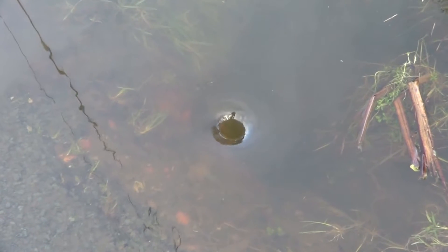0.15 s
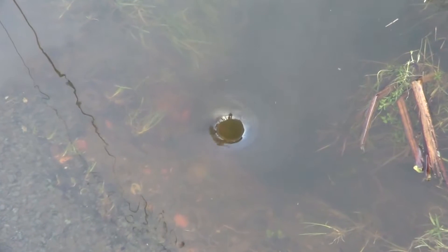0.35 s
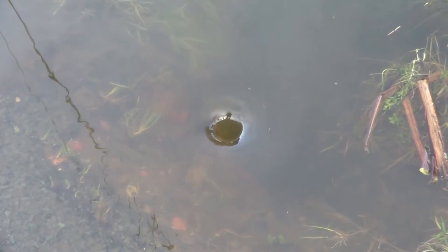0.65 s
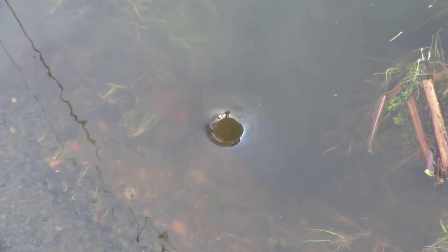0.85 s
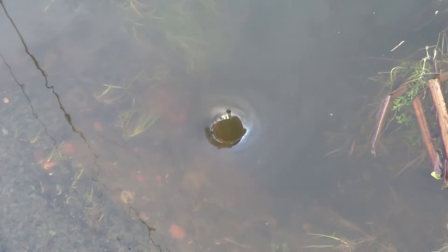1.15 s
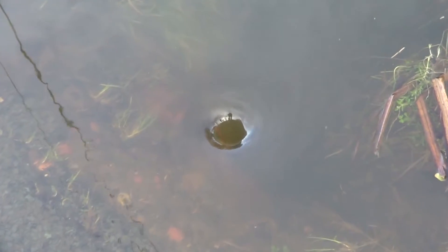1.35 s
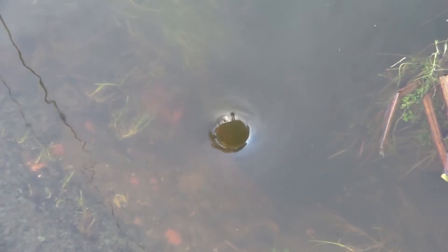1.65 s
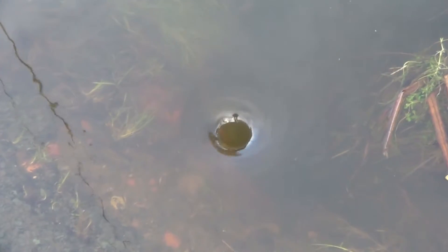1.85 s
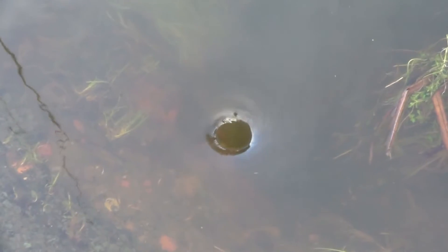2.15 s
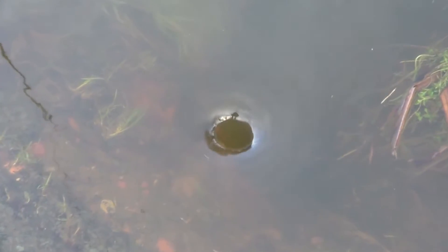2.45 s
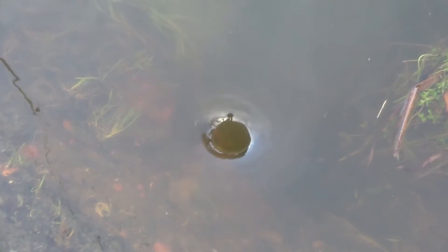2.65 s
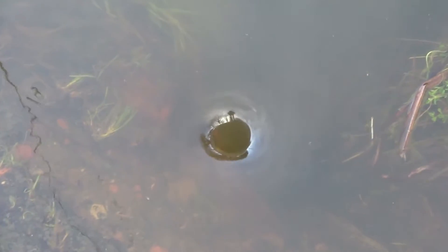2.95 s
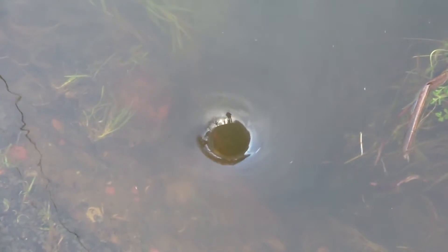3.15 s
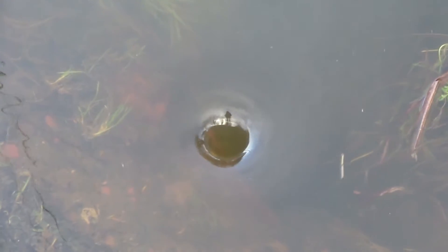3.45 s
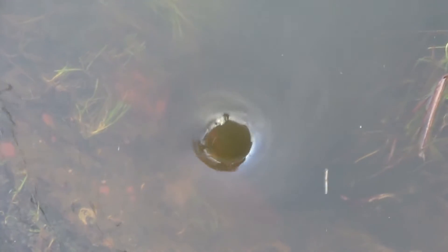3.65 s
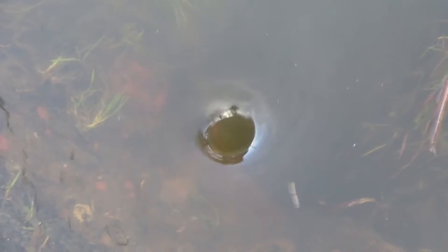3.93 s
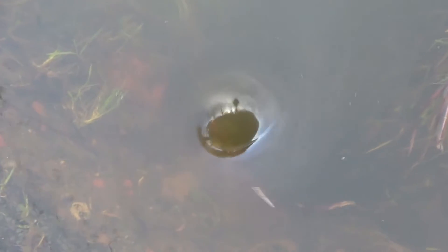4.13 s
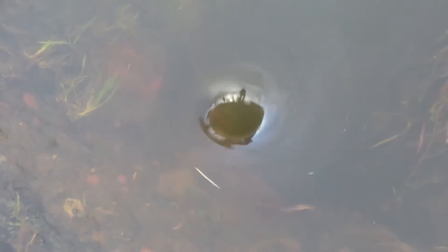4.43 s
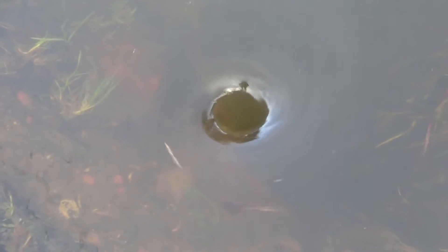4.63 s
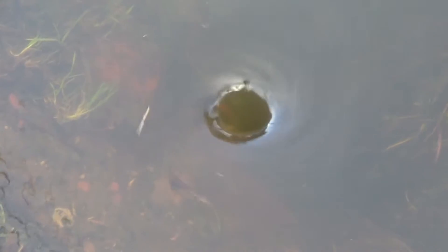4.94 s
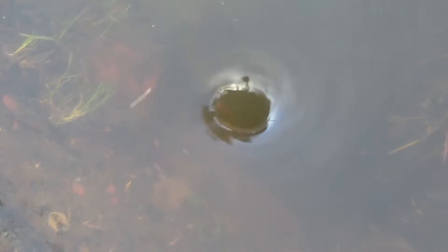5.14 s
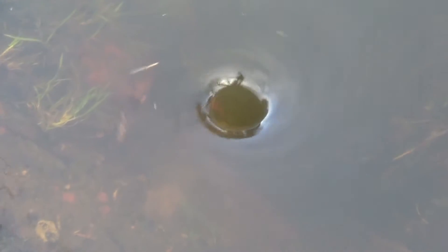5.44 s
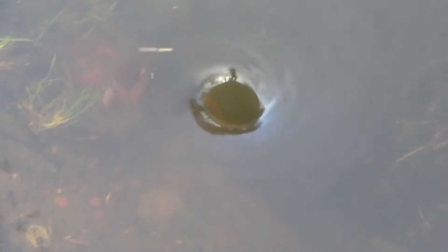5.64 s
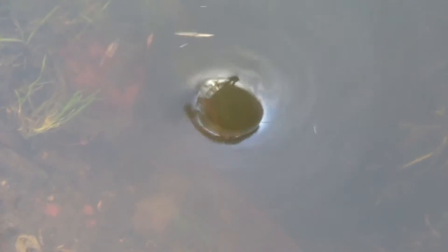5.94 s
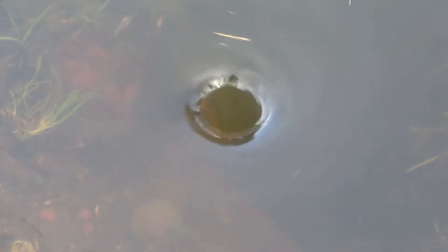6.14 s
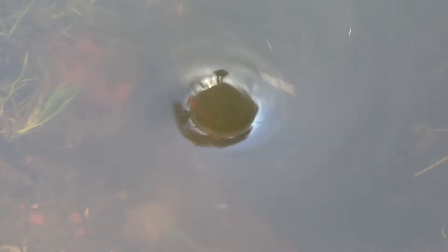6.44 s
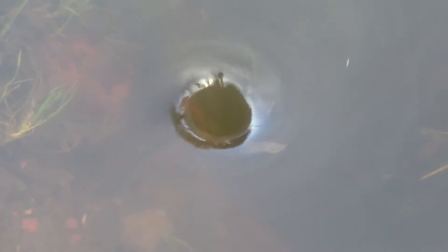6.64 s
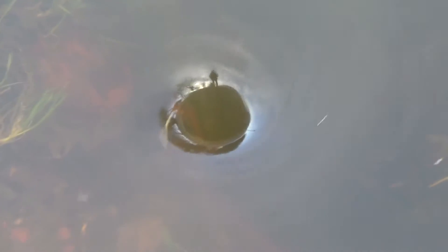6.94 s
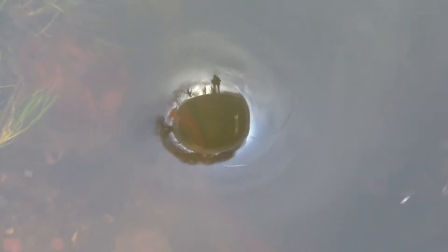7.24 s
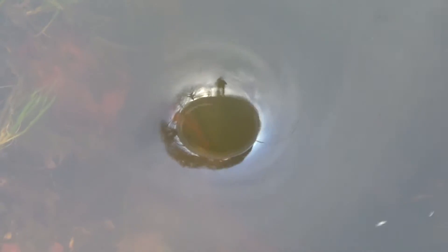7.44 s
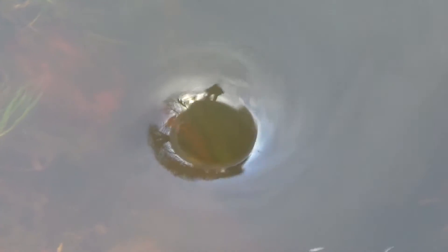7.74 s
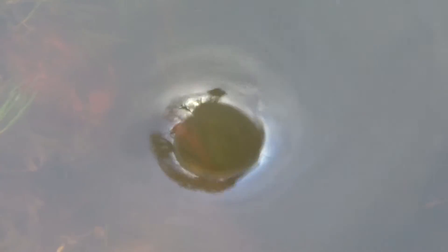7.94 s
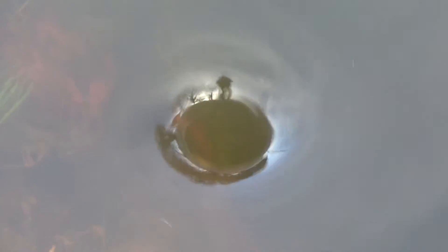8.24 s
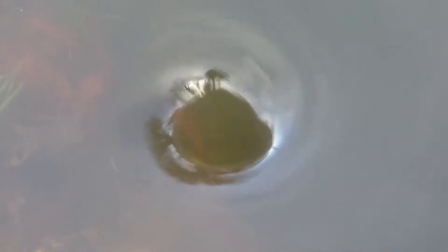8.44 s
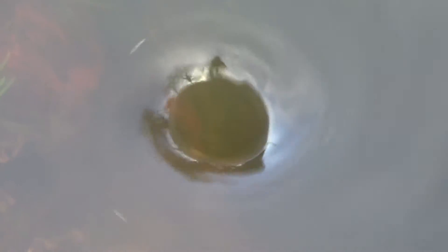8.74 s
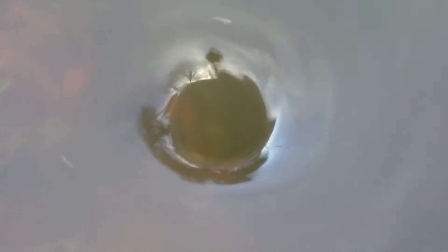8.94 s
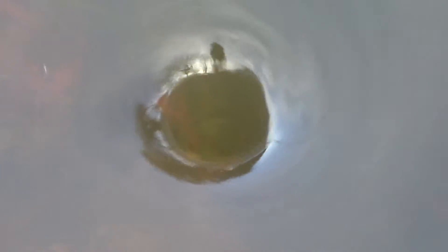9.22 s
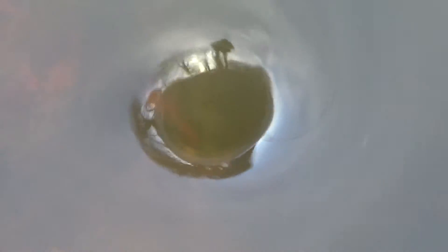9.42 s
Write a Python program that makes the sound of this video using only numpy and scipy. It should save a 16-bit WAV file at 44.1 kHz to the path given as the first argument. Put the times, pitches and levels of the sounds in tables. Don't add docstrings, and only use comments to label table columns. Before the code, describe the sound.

Water swirls and gulps noisily into a little road hole, stops to ticking drips while far birds whistle, then gurgles again and sputters out.

```python
import sys
import numpy as np
from scipy import signal
from scipy.io import wavfile
from scipy.ndimage import uniform_filter1d

SR = 44100
rng = np.random.default_rng(int(sys.argv[2]) if len(sys.argv) > 2 else 0)


def field_ratio(decibels):
    return 10 ** (np.asarray(decibels, dtype=float) / 20)


def digitize_waveform(pressure):
    field = np.atleast_2d(pressure).T
    bounded = np.clip(field, -1, 1)
    quanta = np.round(bounded * 32767).astype(np.int16)
    wavfile.write(sys.argv[1], SR, quanta)


N = 422478
FILTER_HZ = np.fft.rfftfreq(4096, 1 / SR)


def evened(x):
    return x / np.sqrt(np.mean(x ** 2) + 1e-20)


def read(points, hz):
    f, value = np.transpose(points)
    return np.interp(np.log(hz + 1), np.log(f + 1), value)


def add(mix, s, sound):
    part = mix[round(s * SR):][:len(sound)]
    part += sound[:len(part)]


def chance(width):
    size = max(int(width * SR), 2)
    return evened(uniform_filter1d(uniform_filter1d(rng.standard_normal(N), size), size))


def coloured(x, gain):
    log_gain = np.log(np.maximum(np.r_[gain, gain[-2:0:-1]], 1e-5))
    taps = np.fft.ifft(np.exp(np.conj(signal.hilbert(log_gain)))).real[:2048]
    return signal.oaconvolve(x, taps)[:N]


def highpass(x, hz):
    return signal.sosfilt(signal.butter(2, hz, "high", fs=SR, output="sos"), x)


def resonate(x, hz, width):
    turn = np.exp(2j * np.pi * np.cumsum(hz * np.ones(len(x))) / SR)
    r = np.exp(-np.pi * width / SR)
    return 2 * (turn * signal.lfilter([1 - r], [1, -r], x / turn)).real


# time in seconds, level in dB.
SUCTION = [
    [(0.0, -20.5), (0.92, -18), (1.15, -25.5), (1.9, -18.5), (2.44, -23.5), (2.52, -14.5), (2.85, -41.5),
     (3.42, -40.5), (3.8, -52)],
    [(5.35, -50), (5.41, -29.5), (5.62, -26), (5.82, -21), (7.6, -19), (8.25, -16.5), (8.3, -22),
     (8.56, -25), (9.1, -48.5)],
]
# opening in seconds, length in seconds,
# loss of large bubbles in dB, loss of small bubbles in dB.
CHOKES = [(0.372, 0.064, 11, 7.5), (0.438, 0.035, 18, 7), (0.999, 0.052, 15, 17), (1.132, 0.1, -3, 8.5),
          (1.246, 0.024, 4, 29), (1.449, .03, 12, 18), (1.678, 0.02, 7, 16), (2.28, .03, 32.5, 12),
          (2.478, 0.016, 7.5, 29), (3.337, 0.25, 7, 13), (5.475, 0.063, 19, 21), (5.587, 0.13, 39, 4.5),
          (5.749, 0.11, -1, 24), (0.621, 0.041, 6, 7), (6.166, 0.089, 0.5, 9.5), (6.27, 0.031, 2, 10),
          (6.518, 0.008, 16, -4), (6.867, 0.024, 24, -8), (7.25, 0.052, 3.5, 3.5), (7.827, 0.19, 15.5, 6.5),
          (8.277, 0.35, 19, 9.5), (8.286, 0.024, 10, 18), (8.409, 0.031, 30.5, 14), (8.694, 0.13, 13, 8.5),
          (8.963, 0.19, 0, 11), (9.094, .54, 25.5, -5), (5.746, 0.22, 0.5, 7), (8.625, .7, 1, 4.5)]


def suction(column):
    close_share, open_s = 0.5, 0.0013
    t = np.arange(N) / SR
    loss_db = np.zeros(N)
    for row in CHOKES:
        s, length = row[:2]
        span = slice(round((s - length) * SR), round(s * SR))
        left = s - t[span]
        closed = np.minimum((length - left) / (close_share * length), left / open_s)
        loss_db[span] += row[column] * np.clip(closed, 0, 1)
    return sum(field_ratio(np.interp(t, s, db, -99, -99) - loss_db) for s, db in map(np.transpose, SUCTION))


def bubble(hz, cycles, glide, tick, soft=0.3, size=900):
    turns = np.arange(size) * hz / SR
    fade = 0.6 * np.exp(-turns / 1.5) + 0.4 * np.exp(-turns / cycles)
    ring = np.sin(2 * np.pi * turns * (1 + glide * np.minimum(turns / cycles, 2))) * fade
    u = np.arange(size) / 1.3
    return ring * (1 - np.exp(-turns / soft)) + tick * (1 - u) * np.exp(-u)


def swarm(level, gulping, lo_hz, hi_hz, per_s, cycles, spread_db, clump_db, tick, count, size):
    clumps = field_ratio(clump_db * (gulping + 0.5 * chance(0.012)))
    busy = np.minimum(evened(level), 1) ** 1.1
    born = rng.random(N) < per_s / SR * busy * clumps / clumps.mean()
    strength = field_ratio(spread_db * np.minimum(rng.exponential(1, N), 4)) * rng.choice([-1., 1.], N)
    train = born * level / np.sqrt(busy + 1e-9) * strength
    kind, draws, out = rng.integers(0, count, N), rng.random((count, 2)), np.zeros(N)
    for k, hz in enumerate(np.geomspace(lo_hz, hi_hz, count)):
        ringing = cycles * (0.2 + 1.54 * draws[k, 0]) * (hz / lo_hz) ** 0.48
        grain = bubble(hz, ringing, 0.024 * draws[k, 1], tick, size=size)
        out += signal.oaconvolve(train * (kind == k), evened(grain) * np.sqrt(hz / lo_hz))[:N]
    return out


def wake(rows, t60):
    s, db = np.transpose(rows)[:2]
    kicks = np.zeros(N)
    kicks[np.round(s * SR).astype(int)] = field_ratio(db)
    flurry = np.sqrt(abs(signal.lfilter([1], [1, -field_ratio(-60 / (t60 * SR))], kicks)))
    return evened(flurry - flurry.mean())


# frequency in Hz, level in dB per Hz.
HOLE = [(150, -32), (250, -8), (308, -20), (415, -16), (834, -3.5), (1410, 1.5), (1770, -2), (1960, -6),
        (2500, -5), (3370, -3.5), (5250, -11.5), (6770, -8), (8350, -8.5), (11000, -11), (16200, -24.5)]


def gurgle():
    split_hz = 1790
    colour = field_ratio(read(HOLE, FILTER_HZ))
    high_share = 1 - 1 / (1 + (FILTER_HZ / split_hz) ** 12)
    big, fine = field_ratio(-3) * suction(column=2), suction(column=3)
    gulping = chance(0.014) + 0.38 * chance(0.029)
    big_wake = wake(GULPS + LATE_GULPS + LAST_GULPS + PLOPS + LATE_PLOPS, 0.12)
    large = swarm(big, 0.6 * gulping + 0.9 * big_wake, 454.4, 1923, per_s=420, cycles=8.6,
                  spread_db=3.5, clump_db=2.5, tick=9.2, count=24, size=3000)
    fine_wake = wake(SNAPS + LATE_SNAPS + SPITS + LATE_SPITS + FIRST_CRACKS + LAST_CRACKS, 0.046)
    small = swarm(fine, 0.6 * gulping + 0.78 * fine_wake, 2202, 15260, per_s=1000, cycles=6.4,
                  spread_db=4.0, clump_db=3.5, tick=0.66, count=22, size=600)
    large = evened(coloured(large, colour)) * np.sqrt(np.mean(big ** 2))
    small = evened(coloured(small, colour * np.sqrt(high_share))) * np.sqrt(np.mean(fine ** 2))
    return field_ratio(-0.5) * large + field_ratio(-1.0) * small


GULPS = [(0.049, -19, 1066), (0.106, -16, 1050), (0.204, -13, 960), (0.31, -12.5, 904), (0.637, -29, 1010),
         (0.76, -22, 1060), (0.794, -22, 1070), (0.841, -14, 1030), (0.923, -18, 1070), (1.116, -17, 900),
         (1.198, -13.5, 874), (1.279, -15, 846), (1.311, -18.5, 765), (1.477, -20, 829), (1.656, -16, 833),
         (1.699, -19, 1010), (1.764, -14, 885), (1.812, -17, 960), (1.885, -13, 1010), (1.927, -12, 970),
         (2.025, -24, 880), (2.083, -14, 873), (2.129, -15.5, 990), (2.276, -21, 875), (2.368, -10.5, 884),
         (2.448, -15.5, 854), (2.489, -12.5, 797), (2.519, -13, 1060)]
LATE_GULPS = [(5.597, -13.5, 880), (5.629, -15, 906), (5.679, -12.5, 920), (5.786, -18.5, 1050),
              (6.003, -16, 730), (6.09, -10, 1060), (6.263, -12, 960), (6.397, -20, 1040),
              (6.451, -14, 820), (6.539, -9.5, 823), (6.572, -11, 910), (6.731, -18, 872),
              (6.87, -12, 1035), (6.966, -16, 894), (7.032, -11, 760), (7.087, -14.5, 910),
              (7.159, -17, 1020), (7.248, -14, 1004), (7.344, -12, 748), (7.432, -14.5, 1023),
              (7.564, -10.5, 1004), (7.666, -18, 820), (7.841, -23.5, 795), (7.911, -27, 1040),
              (7.956, -16.5, 865)]
LAST_GULPS = [(8.086, -21.5, 1220), (8.107, -15, 1560), (8.297, -8, 1340), (8.301, -7.5, 770),
              (8.332, -20, 853), (8.355, -8, 1260), (8.404, -16, 1660), (8.434, -11, 1450),
              (8.434, -9.5, 837), (8.446, -12, 744), (8.467, -9, 860), (8.491, -15.5, 1016),
              (8.525, -14.5, 1150), (8.553, -20, 884)]
PLOPS = [(0.049, -15, 1100), (0.107, -10, 1380), (0.2045, -10, 1410), (0.2773, -9.5, 1430),
         (0.3506, -13, 1256), (0.3691, -14.5, 1310), (0.4135, -15.5, 1264), (0.641, -10, 1280),
         (0.7607, -12, 1090), (0.7965, -10, 1090), (0.9262, -3, 1530), (0.9956, -19, 1600),
         (1.0736, -15, 1180), (1.1475, -6.5, 1220), (1.255, -15, 1210), (1.7853, -18, 1320),
         (1.8108, -24, 1360), (1.837, -11.5, 1410), (1.8726, -5, 1420), (2.159, -12, 1260),
         (2.2767, -13, 1600), (2.3984, -13, 1240), (2.43, -12, 1200), (2.4735, -16, 1490)]
LATE_PLOPS = [(5.3996, -22, 1430), (5.4761, -12, 1360), (5.5926, -8.5, 1430), (5.6277, -16, 1280),
              (5.6822, -8, 1180), (5.753, -13, 1710), (5.8268, -4.5, 1370), (5.957, -11, 1410),
              (6.002, -3, 1470), (6.0896, -13, 1130), (6.2596, -18, 1250), (6.364, -13.5, 1680),
              (6.4168, -12.5, 1300), (6.5292, -4, 1220), (6.5975, -20.5, 1220), (6.8196, -16.5, 1790),
              (6.8717, 1, 1320), (7.0224, -9, 1140), (7.088, -12, 1350), (7.1516, -12, 1390),
              (7.345, -8, 1400), (7.488, -9, 1380), (7.803, -20, 1600), (7.9121, -6, 1190)]
SNAPS = [(0.2344, -7.5, 3620), (0.4459, -9, 2500), (0.5127, 1, 3800), (0.6045, -8, 3160),
         (0.6569, -3, 2330), (0.7422, -2, 3570), (0.7946, -3.5, 2980), (0.8355, -7, 3330),
         (1.0326, -4, 2450), (1.1623, -9, 2590), (1.2695, 5, 3770), (1.3339, -2, 3350), (1.4486, -17, 2480),
         (1.4666, -0.5, 2400), (1.5524, -13, 2100), (1.5524, -3, 2860), (1.5768, 3, 3500),
         (1.6821, -13, 3730), (1.7474, -5.5, 3880), (1.9031, -8, 3240), (2.159, -10, 2410),
         (2.2313, -9, 4040), (2.2493, -5.5, 3760), (2.2757, -11, 2420), (2.2937, -10.5, 2500),
         (2.4234, -9, 3020), (2.4857, 0.5, 2330), (2.5456, 4.5, 3500), (2.7003, -13, 3480)]
LATE_SNAPS = [(5.7937, 1, 3100), (6.0861, -3, 2730), (6.0991, 2.5, 2350), (6.1747, -4, 3810),
              (6.2594, -4, 3250), (6.368, -8, 2610), (6.3805, -9, 3740), (6.4166, -5, 3400),
              (6.4705, -5, 2750), (6.551, -0.5, 2480), (6.6898, -14, 2290), (6.7145, -4.5, 2120),
              (6.7335, -4, 2200), (7.068, -3, 2380), (7.139, -2.5, 3400), (7.3221, -3.5, 2500),
              (7.345, -7, 3700), (7.3676, 2.5, 3360), (7.3987, -6, 3100), (7.449, -9, 3540),
              (7.5219, -2.5, 3500), (7.697, -4.5, 3200)]
SPITS = [(0.1999, -3, 6700), (0.4534, -8, 8400), (0.617, -17, 8480), (0.7003, -4, 7410),
         (1.0794, -8.5, 10800), (1.1967, -7.5, 6440), (1.2226, -6.5, 8150), (1.269, -9, 6770),
         (1.3054, -9.5, 6800), (1.3578, -7.5, 8300), (1.4486, -9, 9100), (1.4666, -9.5, 7010),
         (1.5524, -7.5, 7000), (1.6811, -8, 6700), (1.7594, -3.5, 7740), (1.8223, -7, 8960),
         (1.9031, -2, 6900), (2.1321, -3, 6720), (2.1919, -4.5, 7800), (2.4843, -4, 8200),
         (2.5042, -5, 6700), (2.6828, -12, 8380)]
LATE_SPITS = [(5.7853, -8, 7000), (5.806, -2, 10300), (5.8656, -8, 7980), (5.903, -7, 6800),
              (5.9564, -5, 11400), (5.9934, -5, 7400), (6.3315, -20, 6360), (6.472, -9, 8500),
              (6.689, -5.5, 6950), (6.9148, -1, 6650), (7.3254, -12.5, 6600), (7.4246, -9, 9000),
              (7.4373, 2.5, 8400), (7.4807, -7, 6400), (7.5, 4, 7150), (7.6254, -4.5, 8900),
              (7.713, -9, 6690), (7.8024, 3.5, 9700), (7.832, -10, 6950), (7.9113, -3.5, 8550)]
TICKS = [(2.7682, -11, 9100), (2.8996, -15, 8100), (2.9987, -12.5, 5300), (3.038, -16, 11300),
         (3.0495, -13, 5730), (3.077, -18, 8350), (3.3984, -13, 8400), (3.5477, -20, 8350),
         (3.9973, -11, 6340), (4.0054, -25, 5790), (5.133, -23, 10800), (9.2744, -22, 8400),
         (9.2834, -25, 8480)]
FIRST_CRACKS = [(5.363, -17, 4610), (5.3932, -23, 3200), (5.3935, -11, 3350), (5.428, -9.5, 3380),
                (5.4745, -22, 11000), (5.4747, -2, 2600), (5.493, -3, 2150), (5.517, -3.5, 7400),
                (5.5404, -20, 6930), (5.5464, -19, 4330), (5.5723, -8, 3990), (5.5901, -1, 2650),
                (5.597, 2, 3500), (5.6287, -7, 2490), (5.6412, -5, 2900), (5.6585, -3, 2610),
                (5.676, -6, 3370), (5.71, -17, 2730), (5.7519, -22, 2980), (5.7525, -5, 3000),
                (5.786, -9, 6950), (5.7936, -7, 3120)]
LAST_CRACKS = [(7.9917, -4, 4540), (8.0118, -21, 8230), (8.013, -0.5, 6800), (8.0302, -10, 3960),
               (8.0406, -18, 6230), (8.0472, -18, 3200), (8.073, -7, 10600), (8.1165, -20, 2650),
               (8.1167, 0, 9200), (8.1285, -4.5, 6900), (8.1365, -5, 8500), (8.2158, -24, 4580),
               (8.2167, -10.5, 8670), (8.2263, -11, 9120), (8.2323, -10.5, 2500), (8.2492, -10, 2640),
               (8.2922, -2.5, 2530), (8.2966, -18, 2100), (8.297, 5.5, 3220), (8.3315, -8, 8040),
               (8.337, -5, 6900), (8.3537, 2, 10800), (8.3745, -8.5, 2910), (8.4042, -2.5, 3000),
               (8.4333, 3.5, 3370), (8.468, -9, 2890), (8.4956, -6, 2350), (8.503, -7, 2830),
               (8.5276, -13, 9140), (8.549, -4, 3300), (8.561, -2.5, 8300), (8.5606, 1, 6630)]
# start in seconds, peak in dB, pitch in Hz.
DRIPS = [(2.738, -32, 1390), (2.7703, -27, 2800), (2.7703, -15, 4000), (2.898, -19.5, 2480),
         (2.9858, -24, 3530), (2.9974, -24.5, 1450), (3.0256, -26, 1400), (3.0875, -30, 3100),
         (3.0906, -19.5, 2910), (3.1406, -27, 2250), (3.1487, -25, 1480), (3.35, -32, 1350),
         (3.3893, -28.5, 1680), (3.3979, -23.5, 3760), (3.4393, -28, 2840), (3.4956, -27, 3200),
         (3.538, -32, 2190), (3.558, -26, 3420), (3.6007, -25.5, 3860), (3.7803, -26.5, 3730),
         (3.9976, -32, 2330), (4.0292, -29.5, 3620), (5.1324, -27, 4320), (5.1412, -24.5, 3320),
         (8.6185, -24, 3260), (8.6811, -24, 7150), (8.6828, -17, 8900), (8.704, -22, 3360),
              (8.739, -47, 2660), (8.758, -18, 7900), (8.7805, -17, 6750), (8.8024, -21, 8850),
              (8.822, -29, 6700), (8.963, -20.5, 6360), (8.982, -24.5, 6820), (9.003, -28, 3720),
              (9.0755, -29.5, 7160), (9.088, -30, 8000)]
# frequency in Hz, gain in dB.
RIM = [(3800, 0), (5200, -4.5), (6800, 1), (11000, -1.5), (16000, -9)]


def single_bubbles():
    ring_s, ring_s_per_db = 0.036, 0.003
    plops = np.zeros(N)
    for rows, trim_db in [(GULPS + LATE_GULPS + LAST_GULPS, 4.0), (PLOPS + LATE_PLOPS, 3.0)]:
        for (s, db, hz), draw in zip(rows, rng.random((len(rows), 2))):
            t60 = abs(ring_s - ring_s_per_db * (db + 10.5)) * 900 / hz * (0.6 + 1.7 * draw[0])
            sound = bubble(hz, t60 * hz / np.log(1000), 0.0024 * draw[1], 0.82, size=3000)
            add(plops, s, field_ratio(db + trim_db) * sound)

    snaps = np.zeros(N)
    for rows, cycles, tick, trim_db in [(SNAPS + LATE_SNAPS, 3.0, 0.6, 3.5),
                                        (SPITS + LATE_SPITS, 2.5, 0.5, 4.0),
                                        (TICKS, 1.5, 0.6, 3.0),
                                        (FIRST_CRACKS + LAST_CRACKS, 1.8, 1.1, 2.5)]:
        for (s, db, hz), draw in zip(rows, rng.random(len(rows))):
            ringing = cycles * (1.03 + 0.96 * draw) * (hz / 2500) ** 0.9
            add(snaps, s, field_ratio(db + trim_db) * bubble(hz, ringing, 0.021, tick))
    out = highpass(plops, 480) + highpass(snaps, 1600)

    drips = DRIPS
    for (s, db, hz), draw in zip(drips, rng.random((len(drips), 3))):
        drip = bubble(hz, 5.7 * (0.41 + 1.6 * draw[0]), 0.01, 0.39, soft=0.83, size=1500)
        add(out, s, field_ratio(db + 10.5) * drip)
        second = bubble(hz * (0.87 + 0.59 * draw[2]), 12.0, 0.0098, 0.94, soft=0.82, size=1500)
        add(out, s + 0.0022 + 0.011 * draw[1], field_ratio(db + 6.0) * second)
    return highpass(coloured(out, field_ratio(read(RIM, FILTER_HZ))), 262)


# pitch in Hz, width in Hz, level in dB.
THROAT = [(676, 17, -1), (1038, 41, -5.5), (1213, 18, -5), (1380, 85, -8.5), (1704, 40, -8)]
# pitch in Hz, width in Hz, level in dB.
PIPE = (845, 22, 3)


def throat(x):
    stretch = 1 + 0.017 * chance(0.075)
    return x + sum(field_ratio(db) * resonate(x, hz * stretch, width) for hz, width, db in THROAT + [PIPE])


# frequency in Hz, gain in dB.
SCATTER = [(500, 11), (1700, 0), (2300, -1), (3800, -16), (4700, 6), (9000, 7.5)]


def scattered(water):
    thrown = coloured(water, field_ratio(read(SCATTER, FILTER_HZ)))
    return field_ratio(-17.0) * echoes(thrown, 0.012, 0.0044, same=0.47)


def echoes(x, t60, start_s, same):
    t = np.arange(SR // 3) / SR
    mid, side = rng.standard_normal((2, len(t))) * field_ratio(-60 * t / t60) * (t > start_s)
    same = np.clip(same, 0, 1)
    tail = mid * same + np.array([side, -side]) * (1 - same)
    return signal.oaconvolve(x[None], tail / np.linalg.norm(tail[0]), axes=1)[:, :N]


# frequency in Hz, level in dB per Hz.
AIR = [(24, -51), (40, -8.5), (288, -3), (387, -3.5), (495, -3.5), (649, -3), (716, 2.5), (1230, -7),
       (1620, -9.5), (1970, -11), (2850, -11), (4660, -14.5), (14500, -20)]
# frequency in Hz, likeness from -1 to 1.
AIR_SAME = [(60, 1), (150, 0.97), (380, 0.58), (950, 0.38), (2380, 0.089), (5980, 0.44), (15000, 0.91)]
# pitch in Hz, width in Hz, level in dB.
DRONE = (310.3, 28, -51)
# level of each in dB, lowest pitch first.
WHINE = [-59, -57, -46, -57, -61]


def air():
    frames, hz, t = N // 256 + 5, np.fft.rfftfreq(1024, 1 / SR), np.arange(N) / SR
    a, b, c, d, patches = rng.standard_normal((frames, 513, 5)).T
    patches = evened(uniform_filter1d(uniform_filter1d(patches, 8, 0), 20, 1))
    same, left = np.clip(read(AIR_SAME, hz), -1, 1)[:, None], a + 1j * b
    right = same * left + np.sqrt(1 - same ** 2) * (c + 1j * d)
    z = np.array([left, right]) * field_ratio(read(AIR, hz)[:, None] + 1.2 * patches)
    wash = field_ratio(-39) * evened(signal.istft(z, nperseg=1024, noverlap=768)[1][:, :N])

    drone_hz, drone_width, drone_db = DRONE
    drone = field_ratio(drone_db) * evened(resonate(rng.standard_normal(N), drone_hz, drone_width))

    line_hz, mains_hz = 15625, 50
    jitter = 0.08 * chance(0.03)
    whine = np.zeros(N)
    for f, db in zip(line_hz + mains_hz * np.arange(-2, 3), WHINE):
        whine += np.sqrt(2) * field_ratio(db) * np.sin(2 * np.pi * (f * t + jitter + rng.random()))
    return wash + drone + whine * field_ratio(0.8 * chance(0.035))


def bird(notes, overtone_db, waver_db, wobble):
    out, waver, shake = np.zeros(N), chance(0.01), chance(0.0017)
    for rows in notes:
        s, hz, db = np.transpose(rows)
        t = np.arange(s[0], s[-1], 1 / SR)
        shaking = np.roll(shake, -round(s[0] * SR))[:len(t)]
        phase = 2 * np.pi * np.cumsum(np.interp(t, s, hz) * (1 + wobble * shaking)) / SR
        tone = np.sin(phase) + field_ratio(overtone_db) * np.sin(2 * phase)
        level = np.sqrt(2) * field_ratio(np.interp(t, s, db))
        add(out, s[0], level * tone * signal.windows.tukey(len(t), 0.12))
    return out * field_ratio(waver_db * waver)


# crest in seconds, crest pitch in Hz, level in dB, rise in seconds, fall in seconds.
WHISTLES = [
    (2.72, 8370, -41.5, 0.032, 0.25),
    (4.83, 8520, -41, 0.19, 0.23),
    (9.25, 8460, -44, 0.14, 0.37),
]


def whistler():
    notes = []
    for s, hz, db, rise, fall in WHISTLES:
        u = np.linspace(-rise, fall, num=24)
        droop = np.where(u < 0, 20000, 4500) * u ** 2
        fade_db = np.where(u < 0, 24, 30) * abs(u)
        notes.append(np.transpose([s + u, hz - droop, db - fade_db]))
    return bird(notes, overtone_db=-60, waver_db=3.5, wobble=0.0027)


# time in seconds, level in dB.
TRILL = [
    (2.9, -68),
    (3.4, -56),
    (4.3, -53.5),
    (5.2, -54.5),
    (5.5, -70),
]


def insect():
    trill_hz, width_hz = 3796, 100
    s, db = np.transpose(TRILL)
    scrape = rng.standard_normal(N) * field_ratio(3.0 * chance(0.02))
    tone = resonate(resonate(scrape, trill_hz, width_hz), trill_hz, width_hz)
    return field_ratio(np.interp(np.arange(N) / SR, s, db)) * evened(tone)


def falling(rows, shape):
    at, sag, start_db, bend_db, end_db = shape
    return [[(s, a, db + start_db),
             (s + at * length, a + (b - a) * (at - sag), db + bend_db),
             (s + length, b, db + end_db)] for s, length, a, b, db in rows]


def with_hooks(notes, lead_s, from_share, soft_db):
    hooks = []
    for note in notes:
        s, hz, db = note[0][0], note[0][1], max(np.transpose(note)[2]) + soft_db
        hooks.append([(s - lead_s, hz * from_share, db), (s, hz, db)])
    return hooks


# start in seconds, length in seconds, first pitch in Hz, last pitch in Hz, level in dB.
SLURS = [
    (3.428, .25, 8450, 7150, -35),
    (3.757, .15, 8150, 6580, -26),
]
CHURRS = [
    (4.0, .048, 6050, 4750, -28),
    (4.114, .05, 6200, 4800, -26),
    (4.224, .052, 6500, 4800, -30),
    (4.35, .048, 6200, 4850, -34),
]
# share of length at the bend, sag as share of the fall, level in dB at start, bend and end.
SLUR_SHAPE = (.27, -.2, -4, -9, 0)
CHURR_SHAPE = (.45, .17, -6, 0, -6)


def songbird():
    slurs, churrs = falling(SLURS, SLUR_SHAPE), falling(CHURRS, CHURR_SHAPE)
    hooks = with_hooks(slurs[1:] + churrs, 0.02, 0.72, -10)
    song = bird(slurs, overtone_db=-36, waver_db=3.5, wobble=0.011)
    song += bird(churrs, overtone_db=-22, waver_db=3.5, wobble=0.014)
    return song + bird(hooks, overtone_db=-14, waver_db=3.0, wobble=0.09)


def scene():
    water = throat(gurgle() + single_bubbles())
    whistles, song = whistler(), songbird()
    wet = scattered(water)
    wet += field_ratio(-3) * echoes(whistles, 0.25, 0.006, same=0.52)
    wet += field_ratio(-3) * echoes(song, 0.28, 0.003, same=0.5)
    placed = whistles * field_ratio(np.array([[-0.6], [0.6]])) + song * field_ratio(np.array([[2.2], [-2.2]]))
    return water + placed + wet + insect() + air()


def top_cut(x):
    return signal.sosfilt(signal.butter(12, 16400, fs=SR, output="sos"), x)


def record(dry):
    clipped = np.clip(highpass(dry, 51.6), -1, 1)
    mid, side = clipped.mean(0), (clipped[0] - clipped[1]) / 2
    width_filter = signal.firwin(255, 9600, window=("kaiser", 9), fs=SR)
    side = signal.oaconvolve(side, width_filter, "same")
    pair = np.array([mid + side, mid - side])
    edge_filter = signal.firwin(511, 15850, window=("kaiser", 9), fs=SR)
    return top_cut(signal.oaconvolve(pair, edge_filter[None], "same"))


dry = scene()
out = record(dry)
digitize_waveform(out)
```